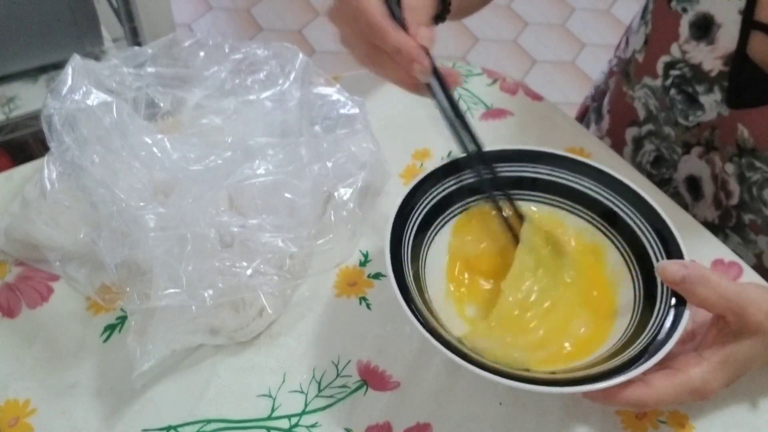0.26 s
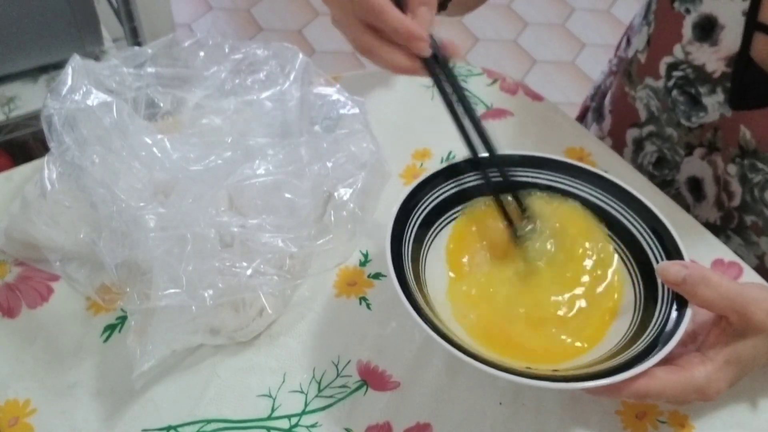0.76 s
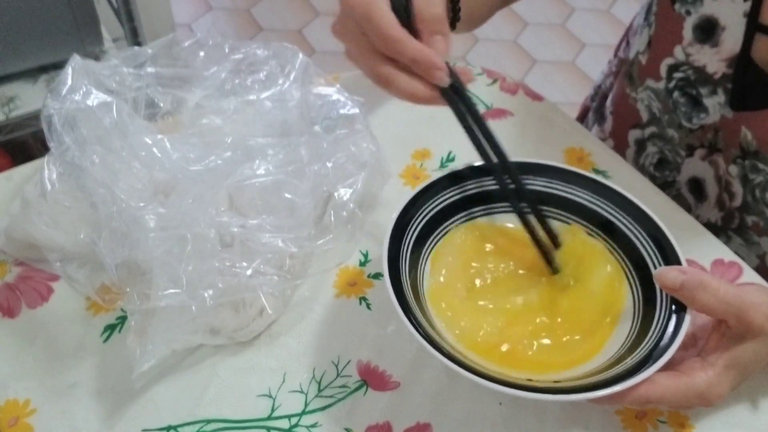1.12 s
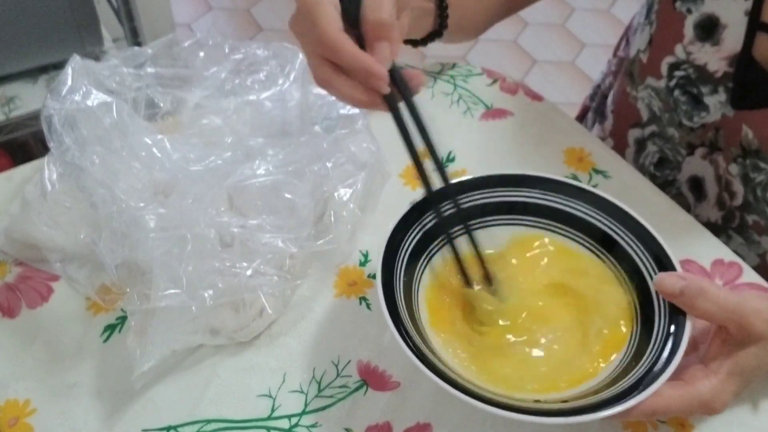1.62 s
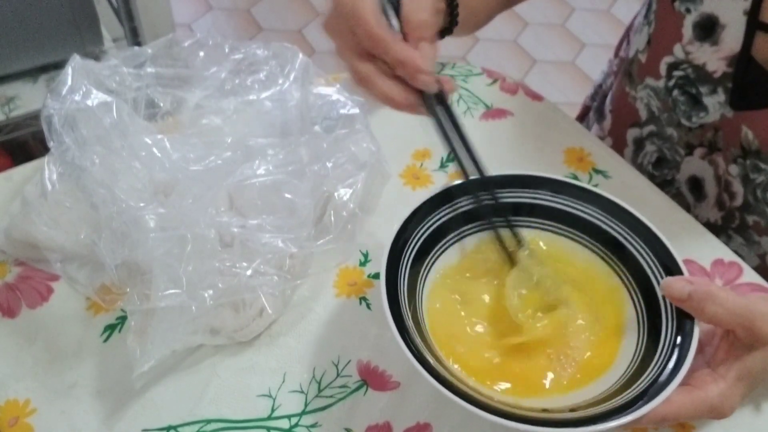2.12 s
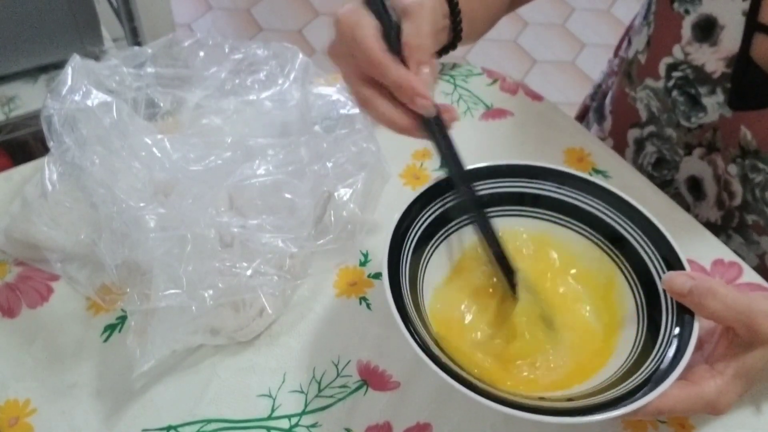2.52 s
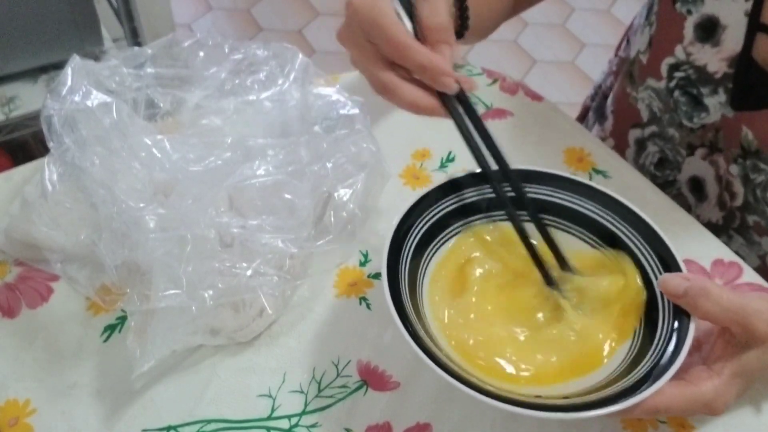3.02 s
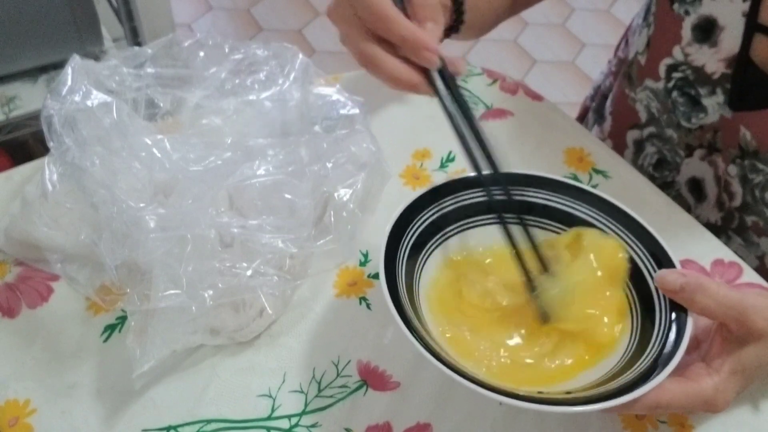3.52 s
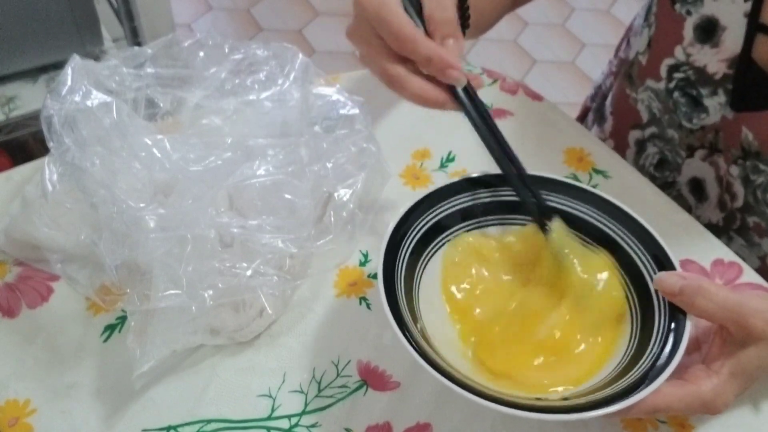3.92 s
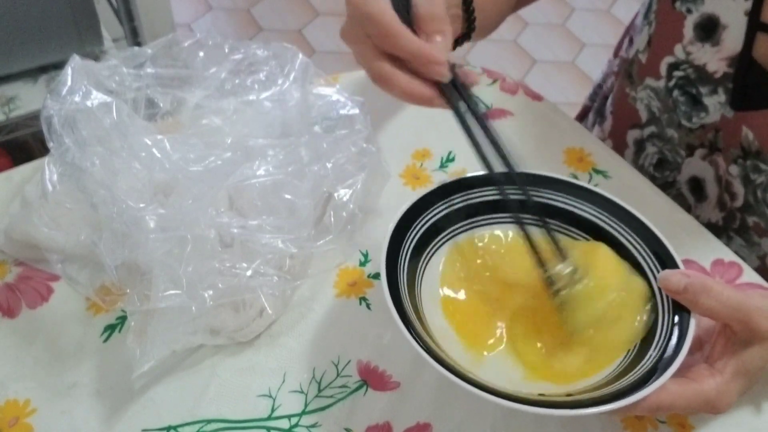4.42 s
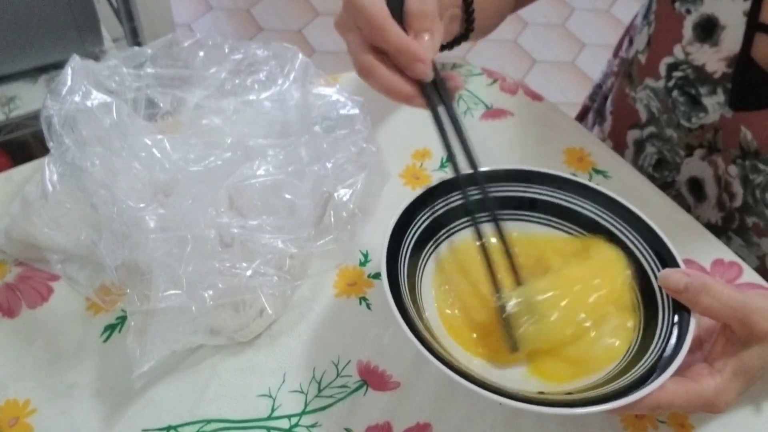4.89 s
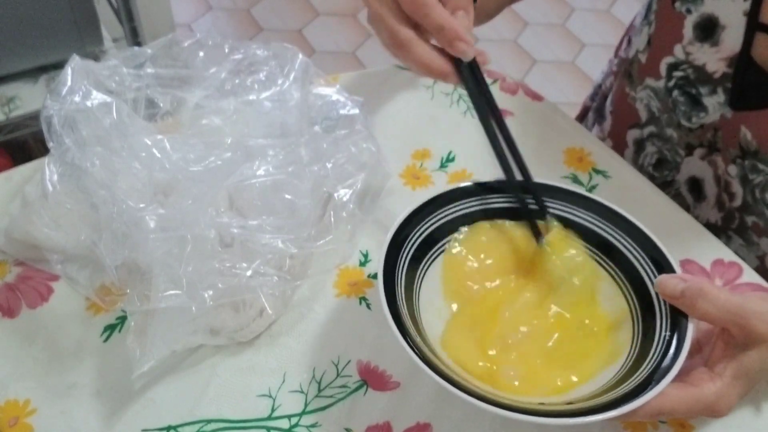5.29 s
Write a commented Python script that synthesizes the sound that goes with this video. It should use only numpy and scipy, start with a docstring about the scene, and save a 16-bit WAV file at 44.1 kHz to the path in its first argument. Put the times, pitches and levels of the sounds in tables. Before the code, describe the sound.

Chopsticks beat eggs in a glazed bowl, quick light clicks and wet slosh with a few bright rim rings in a small kitchen.

```python
"""A rim ring opens the scene: eggs are beaten with chopsticks in a hand-held glazed bowl, whose rim is
struck at the start and again during the beating. The blows ring the modes of the bowl.
The tips tap it through the egg as bursts of filtered noise; short rising sines make plops and dull knocks,
and the egg sloshes and fizzes as crowds of tiny bubbles. A hard-walled kitchen answers with
decaying noise echoes, over room air and a low appliance drone."""
import sys
import numpy as np
from scipy import signal
from scipy.fft import rfft, irfft
from scipy.io import wavfile

SR = 44100
rng = np.random.default_rng(int(sys.argv[2]) if len(sys.argv) > 2 else 0)


def master_out(mix):
    """Clip the mix to full scale and print it as 16-bit PCM to the path in sys.argv[1]."""
    frames = np.transpose(np.atleast_2d(mix))
    ceiling = np.clip(frames, -1, 1)
    pcm = np.round(ceiling * 32767).astype(np.int16)
    wavfile.write(sys.argv[1], SR, pcm)


N = 244755
LEAD = 2048   # samples run before the audible start, so that a blow can begin ahead of it
M = N + LEAD


def amp(db):
    """Gain of a level in dB."""
    return 10 ** (np.asarray(db) / 20)


def rms_one(x):
    """Scale to rms 1."""
    return x / np.sqrt(np.mean(x ** 2) + 1e-20)


def in_time(curve):
    """Read a curve of (seconds, value) at every sample."""
    s, value = np.transpose(curve)
    return np.interp((np.arange(M) - LEAD) / SR, s, value)


def at_hz(points, hz):
    """Read a curve of (Hz, value) on a log-frequency axis."""
    point_hz, value = np.transpose(points)
    return np.interp(np.log(np.maximum(hz, 1)), np.log(point_hz), value)


def coloured(x, spectrum):
    """Minimum-phase filter with the given spectrum, so nothing sounds early."""
    size = 4096
    cepstrum = irfft(np.log(amp(at_hz(spectrum, np.fft.rfftfreq(size, 1 / SR)))))
    # fold the cepstrum onto positive times
    cepstrum[1:size // 2] *= 2
    cepstrum[size // 2 + 1:] = 0
    response = irfft(np.exp(rfft(cepstrum)))
    if x.ndim > 1:
        response = response[None]
    return signal.fftconvolve(x, response)[..., :M]


def band(x, low_hz, high_hz):
    """Band-pass."""
    return signal.sosfilt(signal.butter(2, [low_hz, high_hz], "band", fs=SR, output="sos"), x)


def add(out, s, sound):
    """Mix a short sound in at time s."""
    i = LEAD + round(s * SR)
    out[..., i:i + sound.shape[-1]] += sound[..., :M - i]


def later(x, samples):
    """Delay by any number of samples, whole or fractional."""
    return irfft(rfft(x) * np.exp(-2j * np.pi * np.fft.rfftfreq(M) * samples), M)


# Spectrum of room air and appliance rumble. Each row: frequency in Hz, relative density in dB per Hz.
AIR_SPECTRUM = [(12, -58.5), (20, -10), (59, -9.5), (115, 0.5), (164, -20), (250, -5), (349, -9.5),
                (399, -6), (520, -9.5), (906, -11.5), (1160, -85), (1410, -23), (4000, -38), (5200, -70.5),
                (8800, -120)]
# Resonances of the drone. Each row: centre in Hz, width in Hz, power in dB relative to the other rows.
DRONE_BANDS = [(67, 25, -63.5), (118.4, 3.1, -76.5), (164, 19, -59.5), (201.7, 47, -66),
               (298.5, 4.6, -67.5), (332.7, 7.1, -63.5), (351.2, 17.4, -67)]
# How alike left and right are. Each row: frequency in Hz, correlation (capped at 0.88 when played).
LEFT_RIGHT_LIKENESS = [(60, 1), (240, 0.72), (950, 0.37), (3770, 0.068), (15000, 0.1)]
# Loudness of the whole bed. Each row: time in seconds, level in dB before the left-right balance.
BED_LEVEL = [(0.0, -55), (0.01, -52.5), (1.58, -56), (3.8, -47.5), (3.83, -52.5), (5.25, -53),
             (5.55, -53.5)]


def background():
    """Room air and rumble with a drone: noise that wavers inside narrow resonances."""
    hz = np.fft.rfftfreq(M, 1 / SR)
    power = amp(at_hz(AIR_SPECTRUM, hz)) ** 2
    power = amp(-58.5) ** 2 * power / power.sum()   # air against the drone
    for centre_hz, width_hz, db in DRONE_BANDS:
        shape = 1 / (1 + ((hz - centre_hz) / width_hz * 2) ** 2) ** 2
        power = power + amp(db) ** 2 * shape / shape.sum()
    alike = np.clip(at_hz(LEFT_RIGHT_LIKENESS, hz), 0, .88)
    mid, side = rfft(rng.standard_normal((2, M))) * np.sqrt(power)
    both = irfft(np.sqrt(1 + alike) * mid + np.sqrt(1 - alike) * side * [[1], [-1]], M)
    return amp(in_time(BED_LEVEL)) * rms_one(both) * amp([[1.2], [-1.2]])


# Steadier tones in the drone. Each row: pitch in Hz, rms level in dB before the left-right balance.
HUM_TONES = [(164.5, -73), (353.5, -60.5)]


def hum(wander_hz=2.866):
    """Motor tones, each a sine whose pitch wanders slowly."""
    out = 0
    for hz, db in HUM_TONES:
        wander = np.interp(np.arange(M), np.linspace(0, M, num=60), rng.standard_normal(60))
        phase = 2 * np.pi * np.cumsum(hz + wander_hz * wander) / SR
        out = out + amp(db) * np.sqrt(2) * np.sin(phase)
    return out


# Reverberation of the kitchen. Each row: frequency in Hz, time to fall 60 dB in seconds.
ROOM_DECAY = [(500, 0.35), (1500, 0.37), (4000, 0.33), (8000, 0.36), (14000, 0.086)]


def kitchen(x):
    """Diffuse echoes: half-octave bands of noise dying at their own rate, a separate draw for each side."""
    t = np.arange(int(.7 * SR)) / SR
    tail = 0
    for low_hz in 400 * 2 ** np.arange(0, 5.5, .5):
        noise = band(rng.standard_normal((2, len(t))), low_hz, np.sqrt(2) * low_hz)
        tail = tail + noise * amp(-60 * t / at_hz(ROOM_DECAY, low_hz))
    tail = tail * np.clip((t - .003) / 0.00083, 0, 1)   # silent for 3 ms, then a quick fade-in
    tail = tail / np.sqrt((tail ** 2).sum(axis=1, keepdims=True))
    return signal.fftconvolve(x[None], tail)[:, :M]


def stirred_db(thrown_db, t60, rest_db):
    """Every listed tap and rim rattle stirs the egg up; its level then fades back to rest."""
    blows = np.zeros(M)
    tap_blows = [(s, treble_db) for s, treble_db, *_ in TAP_EVENTS]
    rim_blows = [(s, rattle_db) for s, _, _, rattle_db, _ in RIM_BLOWS]
    for s, db in tap_blows + rim_blows:
        add(blows, s, amp([db + thrown_db]) ** 2)
    fading = signal.lfilter([1], [1, -amp(-60 / (t60 * SR)) ** 2], blows + 1e-18)
    return 10 * np.log10(fading + amp(rest_db) ** 2)


def bubble(hz, t60, rise=0.017):
    """A dying sine that swells over a cycle and rises, as an air pocket does when it nears the surface."""
    t = np.arange(int(t60 * SR)) / SR
    swell = 1 - np.exp(-1.5 * hz * t)
    return np.sin(2 * np.pi * hz * t * (1 + rise * t / t60)) * amp(-60 * t / t60) * swell


# Slosh between taps. Each row: time in seconds, resting level in dB before the mix.
SLOSH_LEVEL = [(0.0, -47), (0.12, -58.5), (0.51, -72), (0.66, -67), (0.96, -62), (1.59, -67), (2.19, -54.5),
               (2.69, -62.5), (2.97, -64.5), (3.46, -64.5), (3.73, -68), (3.83, -56), (4.19, -63.5),
               (4.92, -63), (5.04, -72), (5.3, -73), (5.44, -72), (5.55, -49)]
# Colour of the fizz. Each row: frequency in Hz, filter gain in dB.
FIZZ_COLOUR = [(1470, -23), (2500, 2.5), (3020, -19), (3560, -4), (6520, 4), (8460, -8), (11200, -7.5),
               (12600, -3.5), (14800, 8.5), (16000, -30), (16400, -49)]
SPLASH_DB, SPLASH_T60_S = -42, 0.28   # slosh stirred up by a blow, relative to it; its fading
FROTH_DB, FROTH_T60_S, FROTH_REST_DB = -29, .5, -64   # the same for the fizz; its level at rest


def slosh(per_s=450, fizz_per_s=2500):
    """Clumps of small short bubbles, and a fizz of tiny ones bursting as filtered clicks."""
    slosh_db = stirred_db(SPLASH_DB, SPLASH_T60_S, in_time(SLOSH_LEVEL))
    fizz_db = stirred_db(FROTH_DB, FROTH_T60_S, FROTH_REST_DB)
    sizes = amp(6 * np.minimum(rng.exponential(1, (2, M)), 2.3)) * rng.choice([-1, 1], (2, M))
    clumps = amp(5.0 * np.repeat(rng.standard_normal(M // 800 + 1), 800)[:M])   # about 18 ms each
    born = rng.random((2, M)) < clumps * np.array([[per_s], [fizz_per_s]]) / SR
    pitch_index = rng.integers(0, 14, M)
    small = 0
    for k, hz in enumerate(np.geomspace(1000, 3800, num=14)):
        births = sizes[0] * born[0] * (pitch_index == k)
        small = small + signal.fftconvolve(births, bubble(hz, 33.5 / hz, rise=0.036))[:M]
    fizz = coloured(sizes[1] * born[1], FIZZ_COLOUR)
    return amp(slosh_db) * rms_one(small) + amp(fizz_db) * rms_one(fizz)


# Short pitched sounds from the bowl: plops of air pockets and, in the shortest loud rows, dull knocks.
# Each row: start in seconds, level in dB before the mix, starting pitch in Hz, time to fall 60 dB
# in seconds, room send in dB relative to the direct sound.
PLOPS_AND_KNOCKS = [(0.249, -24.5, 1170, 0.019, -3.5), (0.261, -23.5, 1530, .02, -4.5),
                    (0.289, -31, 1040, 0.014, -5), (.474, -35.5, 980, .015, 2),
                    (0.652, -36.5, 1050, .017, -3), (.676, -42.5, 1570, 0.028, -1),
                    (.705, -19, 1290, 0.022, -16), (0.777, -38.5, 1540, 0.02, -2),
                    (.824, -39, 1370, 0.016, -28), (0.852, -28.5, 1360, 0.015, -10),
                    (0.909, -47, 1450, 0.025, -4), (1.011, -43, 1390, 0.023, -5),
                    (1.086, -39.5, 1260, .018, -20), (1.117, -38.5, 2100, 0.016, -2.5),
                    (1.147, -37, 3190, .015, -18), (1.266, -36, 3220, .015, -1),
                    (1.279, -31, 1530, 0.019, -3.5), (1.299, -38, 3110, 0.022, -6),
                    (1.475, -42.5, 1140, 0.02, -3), (1.581, -43.5, 1920, .015, -10),
                    (1.7, -39, 2020, 0.018, -7), (1.739, -36, 1690, .014, 0),
                    (1.786, -16, 4550, .006, -10.5), (1.874, -44, 926, 0.015, -10),
                    (1.971, -37, 3000, 0.012, 1.5), (1.984, -40, 1310, 0.018, 0),
                    (2.007, -28, 1370, 0.022, -7), (2.073, -38, 2070, .018, -11),
                    (2.105, -41, 1420, 0.022, -11), (2.131, -44, 2030, 0.019, 1),
                    (2.147, -41, 3080, .024, 1), (2.222, -21.5, 1220, .02, -4.5),
                    (2.242, -31.5, 3350, .01, -22), (2.278, -21.5, 1480, 0.025, -9),
                    (2.424, -12, 1180, 0.0048, -9), (2.527, -28.5, 1010, 0.0063, 1),
                    (2.575, -37.5, 3100, 0.016, 0), (2.624, -32.5, 1910, .018, -5),
                    (2.716, -40.5, 864, 0.021, 8), (2.754, -39, 1460, 0.018, -13),
                    (2.772, -26.5, 2960, 0.015, -6.5), (2.832, -34, 1780, .02, -13),
                    (2.992, -40.5, 3070, .02, -5), (3.061, -39, 2700, 0.017, -1),
                    (3.206, -42, 2950, 0.028, 2), (3.224, -37, 2620, 0.016, 3),
                    (3.274, -39, 1560, .015, -7), (3.302, -37, 2860, 0.014, -21),
                    (3.44, -41.5, 3060, 0.016, 5), (3.468, -35, 2920, .025, -0.5),
                    (3.481, -25.5, 2480, 0.0089, -3), (3.607, -39, 2080, 0.022, -12),
                    (3.627, -22, 2680, 0.012, -2), (3.67, -32.5, 2710, .016, -5),
                    (3.707, -32.5, 1180, 0.014, -11), (3.727, -35.5, 2410, .02, -11),
                    (3.833, -27, 2490, 0.015, 2), (3.944, -33.5, 2120, 0.012, 5),
                    (3.968, -19.5, 3080, 0.0086, -8.5), (4.088, -34.5, 1150, .015, 1),
                    (4.176, -39, 1960, 0.016, -12), (4.3, -17.5, 1360, 0.011, -9),
                    (4.412, -7, 1670, 0.0072, -10.5), (4.415, -18, 2000, 0.01, -11),
                    (4.543, -30, 2030, 0.015, -7), (4.63, -31, 1030, .014, -8),
                    (4.747, -17, 994, 0.025, -2), (4.792, -40, 940, 0.028, 6), (4.844, -22, 693, .024, 0.5),
                    (4.958, -33.5, 1130, 0.022, -1), (5.005, -35, 1134, 0.018, -8),
                    (5.066, -34, 960, 0.021, -4), (5.2, -28.5, 2950, 0.019, -9),
                    (5.215, -26, 2960, 0.022, -10), (5.286, -23.5, 2970, 0.0054, -2.5),
                    (5.314, -33, 2490, 0.013, -11), (5.438, -28, 1540, 0.028, -7),
                    (5.536, -17, 2560, 0.0061, -3)]


def plops_and_knocks():
    """Short rising sines, each joined by two quieter, shorter ones, a little higher or lower in pitch."""
    out = np.zeros((2, M))   # rows: towards the microphone, into the room
    draws = rng.random((len(PLOPS_AND_KNOCKS), 4))
    for (s, db, hz, t60, room_db), draw in zip(PLOPS_AND_KNOCKS, draws):
        gain = amp(db + np.array([[0], [room_db]]))
        add(out, s, gain * bubble(hz, t60))
        for late, off in draw.reshape(2, 2):
            companion = bubble(hz * 1.317 ** (2 * off - 1), 0.38 * t60)
            add(out, s + 0.33 * t60 * late, amp(-7.0) * gain * companion)
    return out


# Blows on the bare rim. Each row: start in seconds, ring in dB before the mix, place from 0 (lip)
# to 1 (lower wall), rattle of the sticks in dB before the mix, decay constant of the rattle in ms.
RIM_BLOWS = [(-0.004, -23.5, 0.25, -9, 17.3), (0.2217, -20.5, 0.039, -12.5, 21), (2.278, -47, 0.3, -6.5, 3),
             (3.837, -24.5, 0.49, -6.5, 11)]
# Modes of the bowl. Each row: pitch in Hz, lip level in dB and lower-wall level in dB (weighted by
# the place of the blow), time to fall 60 dB in seconds.
BOWL_MODES = [(890.2, -13, 3.5, 0.36), (1915, -7, 7, 0.27), (3316, -2.5, -19, 0.25),
              (3310, -20.5, -28.5, 0.043), (5090, -6.5, 1.5, 0.15), (4960, -9, 5, 0.36),
              (7000, -4.5, -57.5, 0.1), (7025, -0.5, -4.5, 0.23), (9100, -10.5, 10, 0.075),
              (9970, -3.5, 10, 0.092), (10540, 0, -1, 0.055), (11510, 1.5, -10.5, 0.074),
              (12060, 14, -24, 0.025), (12200, 4, -25, 0.023), (12700, -25, -10.5, .1),
              (12200, -3, -9.5, 0.073), (13200, -3.5, 5, 0.16), (13745, -16, -1, 0.072),
              (13450, -8, 22.5, 0.044), (14030, -6.5, 13.5, 0.22), (16000, 5.5, -19, 0.17)]


def rim(rough=0.7, waver_hz=80):
    """A rim blow sets every mode ringing; hand and moving egg make each mode waver, high ones most."""
    t, out = np.arange(11 * SR // 20) / SR, np.zeros(M)
    hz, lip_db, wall_db, t60 = np.transpose(BOWL_MODES)[:, :, None]
    rings = np.exp(2j * np.pi * hz * t) * amp(-60 * t / t60)
    slow = signal.butter(2, waver_hz, fs=SR, output="sos")
    for s, db, place, _, ms in RIM_BLOWS:
        noise = rng.standard_normal((2, len(BOWL_MODES), LEAD + len(t)))
        waver = signal.sosfilt(slow, noise)[..., LEAD:]   # skip the filter's start
        loaded = 1 + rough * hz / 6000 * (rms_one(waver[0]) + 1j * rms_one(waver[1]))
        mode_gain = amp(db + (1.5 - place) * lip_db + place * wall_db)
        ring = (mode_gain * rings * loaded).imag.sum(axis=0)
        add(out, s, ring * (1 - np.exp(-4000 * t / ms)))   # builds up while the sticks rattle
    return out


def contact(treble_db, snap_db, body_db, snap_hz, ms, noise):
    """A burst of micro-impacts; egg around the tip shifts it between body, snap and treble."""
    u = 1000 * np.arange(noise.shape[1]) / SR / ms   # time in decay constants
    one_impact = 0.24 * np.exp(-((u - .5) / 0.028) ** 2)   # stands out of the burst
    fade = (np.exp(-u) + one_impact) * np.minimum(u / .5, 1)
    layers = [(0, 8500, 18000),   # treble
              (snap_db + 14.0, snap_hz / 1.078, snap_hz * 1.045),
              (snap_db + 5.5, 3200, 8500),   # wider band around the snap
              (body_db + 10.0, 600, 3200)]
    out = 0
    for (db, low_hz, high_hz), grit in zip(layers, noise):
        share = np.sqrt((high_hz - low_hz) / SR * np.mean(fade ** 2))
        out = out + amp(db) * share * rms_one(band(grit * fade, low_hz, high_hz))
    return amp(treble_db) * out


# Tips tapping the bowl. Each row: start in seconds, treble in dB before the mix, snap and body in dB
# relative to it before the layer trims, snap pitch in Hz, room send in dB relative to the direct sound.
TAP_EVENTS = [(0.2258, -5, -18, -29, 7000, -10), (0.4674, -24, -28, -21, 6750, -2),
              (0.4723, -28.5, -6, -15, 7300, -3.5), (0.646, -36, -10, -19, 5400, -5),
              (0.675, -53, -5, 1.5, 6500, 11.5), (0.704, -35, -12, -5, 6150, -5),
              (0.7764, -27, -13, -12, 6950, -5), (0.852, -34, -13, -8.5, 5360, -3),
              (0.9058, -39, -19, -5.5, 3560, 4.5), (0.9183, -36, -12, -16, 6460, -2),
              (1.066, -38, -7.5, -5, 3400, 3.5), (1.1039, -35, -10, -9, 3100, 2.5),
              (1.1159, -37, -11, -25, 5530, -2), (1.1458, -31.5, -5, -9, 3470, -1),
              (1.2787, -21, -11, -15.5, 6160, -4), (1.296, -32.5, -2, -12, 3180, -2.5),
              (1.476, -52, -11, 6.5, 3230, 7.5), (1.5147, -29.5, -2.5, -17, 6500, -5.5),
              (1.6302, -38, -21, -28, 5390, -8), (1.701, -42, -1, -10, 5280, -2),
              (1.729, -38, -5, -37, 6360, 0), (1.7411, -25, -6, -25, 4200, -6.5),
              (1.7856, -32, -15, -23, 4660, -5), (1.8597, -45, -2.5, -13, 5130, 9),
              (1.8725, -31, -6.5, -25, 4600, -11), (1.965, -37.5, -6.5, -10, 6060, 4),
              (2.0133, -35.5, -9, 1.5, 4040, -3.5), (2.073, -35, -10, -7, 6240, -2),
              (2.1322, -41.5, 0.5, -5, 5930, 5.5), (2.15, -33, -4, -15, 3650, -11),
              (2.2077, -31, -11, -10, 5370, -3), (2.2788, -9.5, -13, -21, 7300, -8),
              (2.3377, -42, 1, 1, 7000, 0.5), (2.4215, -25.5, -37, -11, 6800, -3.5),
              (2.4946, -20, -17, -16, 7060, -2.5), (2.4995, -28.5, -3, -16, 4080, -12),
              (2.573, -33, -2, -14, 4270, -2), (2.6796, -50, 8, 5, 3300, -6.5),
              (2.7161, -24.5, -15, -13.5, 6600, -2.5), (2.7525, -30, -10.5, -6, 6440, -0.5),
              (2.8258, -34.5, -17, -17, 5560, -8), (2.863, -42, -4, -14, 3800, -4.5),
              (2.956, -31.5, -9, -8, 7030, 0.5), (2.9954, -41, 0, -16, 6400, -10),
              (3.0334, -39.5, -0.5, -3.5, 4040, 1.5), (3.1637, -38, -3.5, -5, 6100, 0),
              (3.2034, -44, -6, -7.5, 7100, 9), (3.3734, -49.5, 3.5, -6, 3200, 1.5),
              (3.4406, -35.5, -3.5, -16, 3970, 6), (3.6061, -37, -2, -6, 4800, -1),
              (3.6246, -9, -30, -16, 7800, -1), (3.7403, -25, -11, -16, 3760, -8),
              (3.8379, -16.5, -11.5, -13.5, 6900, 1.5), (4.0623, -32.5, -15, -15, 6970, 2.5),
              (4.0899, -23, -13.5, -12, 6700, -2.5), (4.1754, -22, -14, -17.5, 5370, -9.5),
              (4.2971, -24, -22, -10, 6450, -14), (4.3017, -8.5, -20.5, -13, 3940, -4),
              (4.4114, -42.5, -13, 12, 3300, -3.5), (4.43, -27, -38, -27, 4490, -2),
              (4.5228, -31.5, -5.5, -9, 6350, 4.5), (4.5376, -31, -2, -9.5, 6430, -6.5),
              (4.6291, -22, -39, -25, 6000, -9), (4.7192, -39.5, -29, -10.5, 6200, 2.5),
              (4.7396, -10.5, -18.5, -12.5, 6500, -1.5), (4.8074, -27.5, -4.5, -23, 5300, -3.5),
              (4.8422, -32.5, 6.5, 10, 6000, -7), (4.9482, -34.5, -12.5, -13, 7340, 7),
              (4.9641, -22, -12.5, -11.5, 6470, 2), (5.0371, -37, 3, -16, 7150, -15),
              (5.0613, -32.5, -22, -22, 7360, -9), (5.1838, -43, -2, -11, 5730, 3),
              (5.2007, -15.5, -15.5, -16, 3380, 0.5), (5.3205, -28, -18, -12.5, 3430, -10),
              (5.426, -35, -33, -13, 6600, -2.5), (5.438, -16.5, -17.5, -11.5, 6800, -1),
              (5.5353, -31.5, 4, -8, 3220, -5)]
# Colour of all stick contacts. Each row: frequency in Hz, filter gain in dB.
STICK_COLOUR = [(290, -6), (500, -20), (910, 1), (1890, -3), (2090, 2.5), (2600, -7), (2880, -0.5),
                (4870, -2), (7230, 0), (8490, -11.5), (12800, 4), (15000, 4), (16400, -85)]
CONTACT_MS = 2.43   # decay constant of a tap
GRAZE_COUNT, GRAZE_DB, GRAZE_SPREAD_DB = 30, -46, 4   # faint touches at random moments
GRAZE_SNAP_DB, GRAZE_BODY_DB, GRAZE_ROOM_DB = -31.5, -46, 9


def taps():
    """Taps, faint grazes and sticks rattling on after rim blows, all bursts of micro-impacts."""
    out = np.zeros((2, M))   # rows: towards the microphone, into the room
    grazes = []
    for when, size, tone in rng.random((GRAZE_COUNT, 3)):
        graze_db = GRAZE_DB + GRAZE_SPREAD_DB * (2 * size - 1)
        snap_hz = 3300 * 2.2 ** tone
        grazes.append((when * N / SR, graze_db, GRAZE_SNAP_DB, GRAZE_BODY_DB, snap_hz, GRAZE_ROOM_DB))
    touches = list(TAP_EVENTS) + grazes
    for (s, *tap, room_db), noise in zip(touches, rng.standard_normal((len(touches), 4, 1500))):
        add(out, s, amp([[0], [room_db]]) * contact(*tap, CONTACT_MS, noise))
    for (s, _, _, rattle_db, ms), noise in zip(RIM_BLOWS, rng.standard_normal((len(RIM_BLOWS), 4, 5000))):
        rebounds = amp(6.3 * np.repeat(rng.standard_normal(100), 50))   # uneven, about a millisecond each
        rattle = contact(rattle_db, -20.5, -21.5, 5230, ms, noise * rebounds)
        add(out, s, amp([[-2.5], [-5.5]]) * rattle)
    return amp(5.5) * coloured(out, STICK_COLOUR)


def scene():
    """The bowl is near and to the left, reaching the right side later; the room answers from all round."""
    ringing, wet = rim(), slosh()
    (sticks, sticks_out), (pitched, pitched_out) = taps(), plops_and_knocks()
    near = amp([[3.0], [-3.5]]) * (sticks + amp(-4.0) * ringing) + amp([[1.6], [-1.6]]) * (pitched + wet)
    near[1] = later(near[1], 0.93)
    echoes = kitchen(sticks_out + amp(1.5) * ringing + pitched_out + amp(-16.5) * wet)
    bed = background() + amp([[-.6], [.6]]) * hum()
    return (near + amp([[2.2], [-2.2]]) * echoes + bed)[:, LEAD:]


def record(dry):
    """The right side is shaded in the treble, the loudest peaks are rounded, the top is cut."""
    treble = signal.sosfilt(signal.butter(1, 7000, "high", fs=SR, output="sos"), dry[1])
    shaded = np.array([dry[0], dry[1] - 0.14 * treble])
    rounded = np.tanh(shaded / .85) * .85
    return signal.sosfilt(signal.cheby2(14, 70, 16600, fs=SR, output="sos"), rounded)


dry = scene()
out = record(dry)
master_out(out)
```